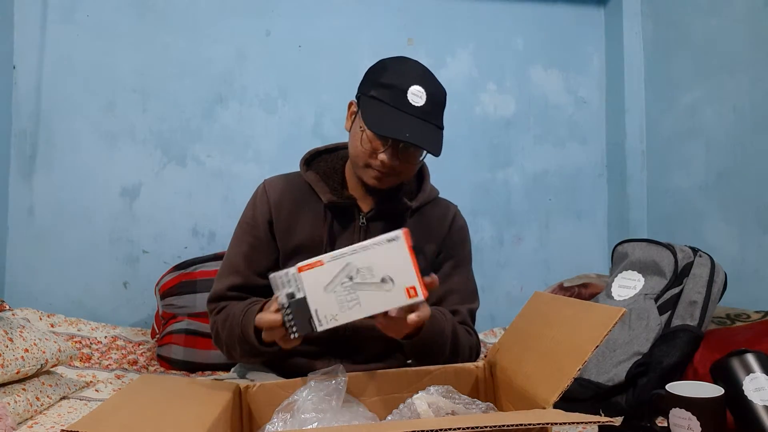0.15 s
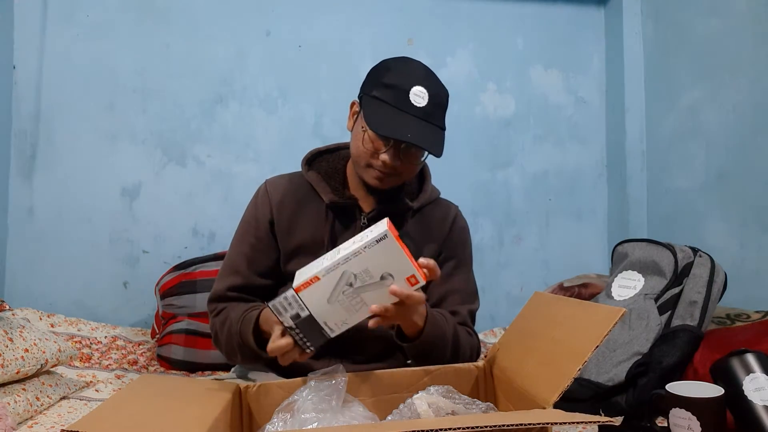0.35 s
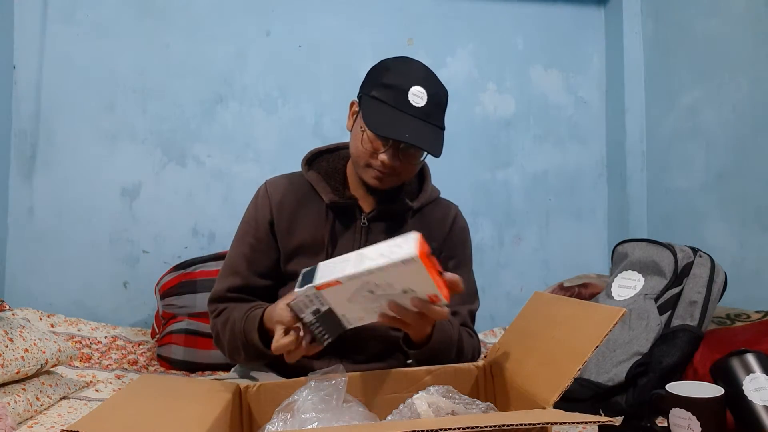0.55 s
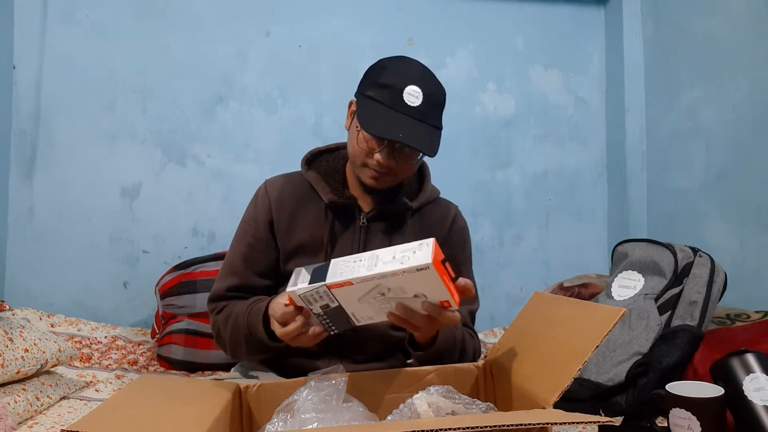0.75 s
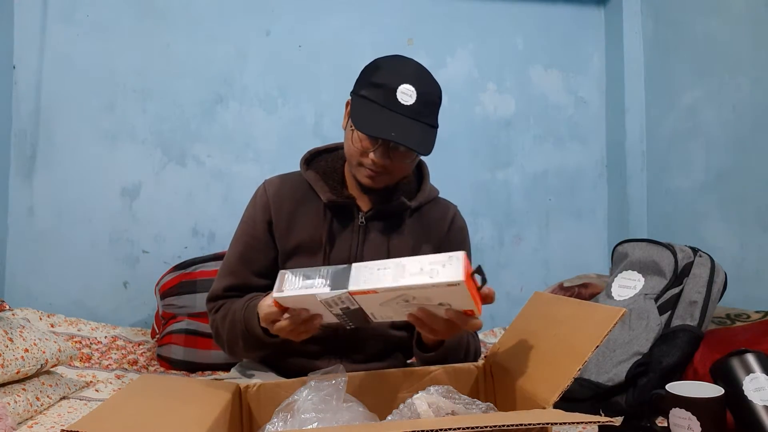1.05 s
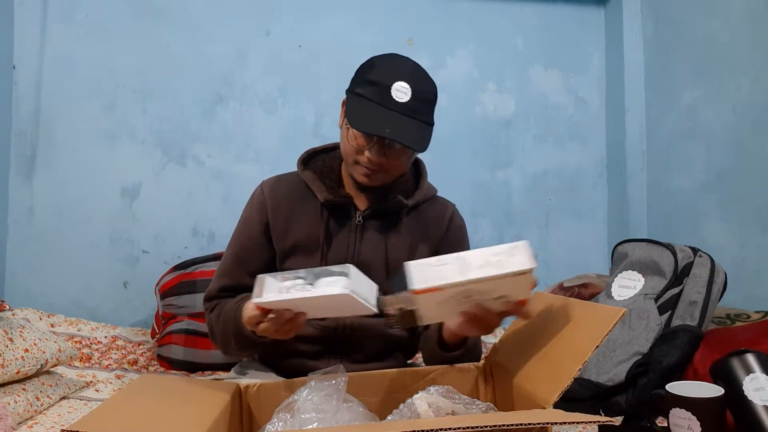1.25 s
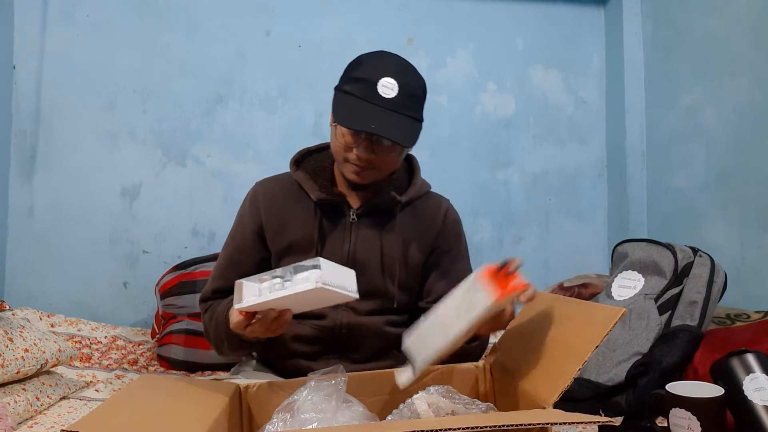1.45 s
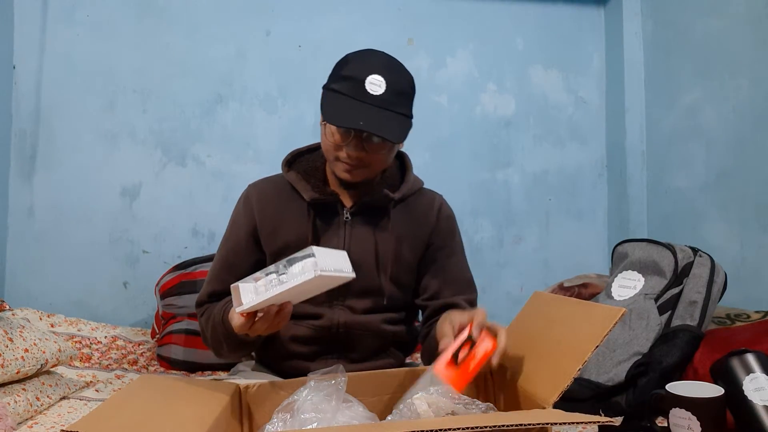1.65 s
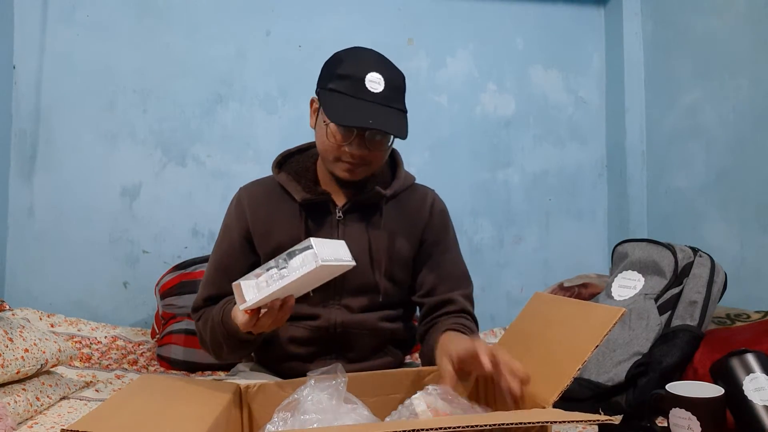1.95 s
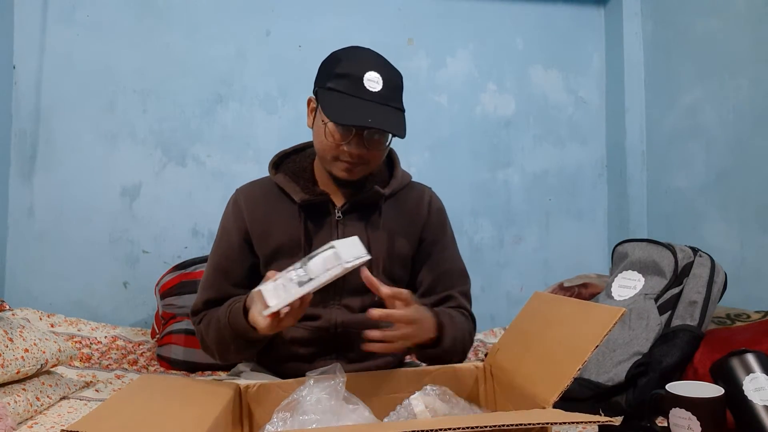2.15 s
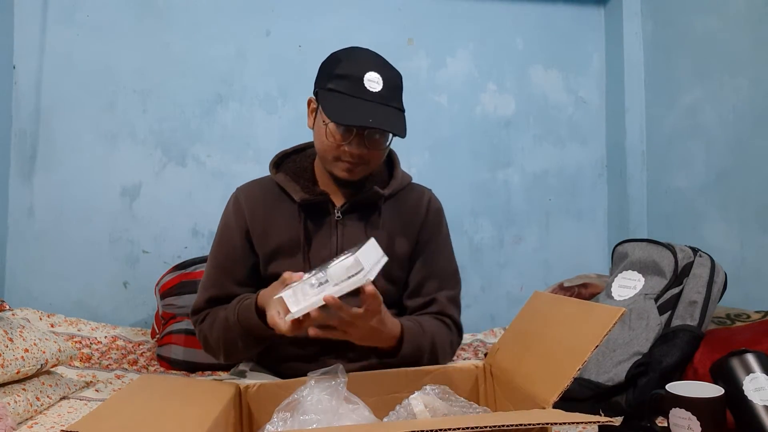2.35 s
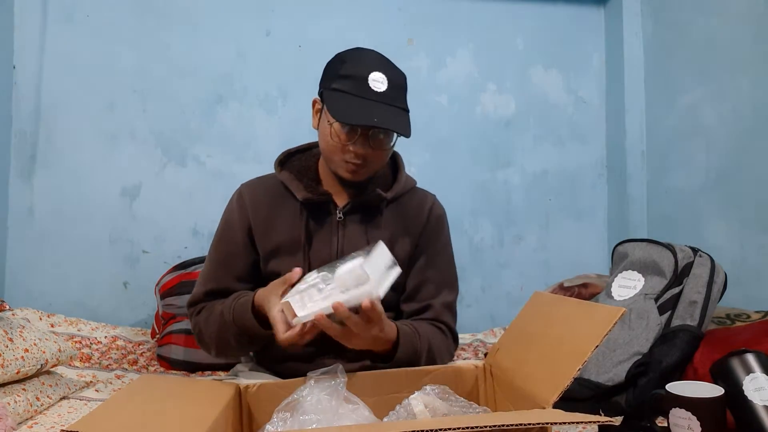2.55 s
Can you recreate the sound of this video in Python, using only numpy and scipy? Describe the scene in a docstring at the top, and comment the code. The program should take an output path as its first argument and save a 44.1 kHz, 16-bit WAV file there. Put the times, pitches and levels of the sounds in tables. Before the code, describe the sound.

Cardboard packaging handled in a small quiet room: light taps and a scrape, three short squeaky tugs as a plastic tray slides out, then the empty sleeve knocks and rustles into a large carton, heard from a metre or two.

```python
"""In a small quiet room a thin card sleeve is worked open by hand: grainy hiss, scrape, ringing taps.
A plastic tray slides out in three tugs, squeaking on the card as sine slips and grit that rings edge modes.
The empty sleeve drops into a large carton: filtered grains rustle as film, blows and rumble ring wall modes.
Last, fingers brush the tray: high hiss over a duller rub.
A two-port microphone hears it a metre or two away, over steady room tone and a diffuse noise tail."""
import sys
import numpy as np
from scipy import signal
from scipy.fft import rfft, irfft, next_fast_len
from scipy.io import wavfile
from scipy.ndimage import uniform_filter1d, map_coordinates

SR = 44100
rng = np.random.default_rng(int(sys.argv[2]) if len(sys.argv) > 2 else 0)


def unload_audio(sound):
    """Save the sound as a 16-bit wav file, at the path given as the first command line argument."""
    columns = np.transpose(np.atleast_2d(sound))
    # keep every value between -1 and 1, then stretch to whole-number steps
    steps = np.round(np.clip(columns, -1, 1) * 32767)
    wavfile.write(sys.argv[1], SR, steps.astype(np.int16))


N = 119070


def undb(db):
    """Decibels to amplitude."""
    return 10 ** (np.asarray(db) / 20)


def unit(x):
    """Scale to unit RMS."""
    return x / np.sqrt(np.mean(x ** 2))


def unit_energy(x):
    """Scale to unit energy, averaged over the channels of a two-channel array."""
    channels = len(x.shape)
    return x / np.sqrt(np.sum(x ** 2) / channels)


def fade(t_s, t60_s):
    """Exponential decay by 60 dB in t60, at least 5 ms."""
    return np.exp(-np.log(1000) * np.abs(t_s) / np.maximum(t60_s, .005))


def colour(x, points):
    """Zero-phase filter through (Hz, dB) points, interpolated over log frequency."""
    hz, db = np.array(points, float).T
    length = x.shape[-1]
    n = next_fast_len(length)
    bin_hz = np.maximum(np.arange(n // 2 + 1) * SR / n, 1)
    gain_db = np.interp(np.log(bin_hz), np.log(np.maximum(hz, 1)), db)
    return irfft(rfft(x, n) * undb(gain_db), n)[..., :length]


def curve(table, axis):
    """Gain over time from one dB column, -150 dB outside the table."""
    p = np.array(table, float)
    return undb(np.interp(np.arange(N) / SR, p[:, 0], p[:, axis], left=-150, right=-150))


def ring(x, modes):
    """Excite decaying sine modes, sign flipping every four; the summed impulse response peaks at 1."""
    t = np.arange(SR // 4) / SR
    body = 0
    for k, (hz, db, t60) in enumerate(modes):
        decay = np.exp(-np.log(1000) * t / max(t60, .004))
        body = body + (-1) ** (k // 4) * undb(db) * np.sin(2 * np.pi * hz * t) * decay
    return signal.fftconvolve(x, body / np.abs(body).max())[:N]


def band(x, hz, width_hz):
    """Resonant band at unit RMS."""
    return unit(signal.lfilter(*signal.iirpeak(hz, hz / width_hz, fs=SR), x))


def grains(rate_per_s, scatter_db):
    """Dense random clicks of uneven size, unit RMS."""
    hit = rng.random(N) < rate_per_s / SR
    boost_db = scatter_db * np.minimum(rng.exponential(size=N), 2)
    return unit(hit * rng.standard_normal(N) * undb(boost_db))


def walk(rate_per_s):
    """Smoothed random steps, unit RMS."""
    k = int(SR / rate_per_s)
    steps = np.repeat(rng.standard_normal(N // k + 1), k)
    return unit(uniform_filter1d(uniform_filter1d(steps, k), k)[:N])


THUMP_S, CRACK_ABOVE_HZ, RATTLE_RISE_S = 0.00026, 554, 0.0036


def blows(table, modes):
    """Each blow is a soft thump and a hard crack, both with a fading noise rattle, ringing the body."""
    push, t = np.zeros((2, N + SR)), np.arange(SR // 2) / SR
    chance = rng.standard_normal((len(table), 2, len(t)))
    for (s, crack_db, thump_db, rattle_db, t60), noise in zip(table, chance):
        shape = np.clip(t / RATTLE_RISE_S, 0, 1) * fade(t, t60)
        rattle = noise * undb(rattle_db) * shape / np.sqrt(np.sum(shape ** 2))
        force = (t == 0) + rattle
        start = int(s * SR)
        push[:, start:start + len(t)] += undb([[thump_db], [crack_db]]) * force
    soft = t * np.exp(-t / THUMP_S)
    thump = signal.fftconvolve(push[0], soft / soft.sum())
    crack = signal.sosfilt(signal.butter(2, CRACK_ABOVE_HZ, "high", fs=SR, output="sos"), push[1])
    return ring(thump[:N] + crack[:N], modes)


# Spread of diffuse sound. Each row: frequency in Hz, side over mid in dB.
SIDE_WIDTH = [(40, -9), (120, -11), (300, -11), (600, -2.5), (1200, -1.5), (2500, -0.9), (15000, 0.2)]


def spread(mid, side):
    """Two diffuse signals to left and right; the bass is nearly the same in both."""
    side = colour(side, SIDE_WIDTH)
    return np.array([mid + side, mid - side])


# Room tone spectrum. Each row: frequency in Hz, relative gain in dB.
AIR_COLOUR = [(12, -37.5), (20, -1.5), (98, -2.5), (316, -7.5), (406, -13.5), (583, -13), (1780, -38.5),
              (1930, -29.5), (3380, -59), (4990, -53), (15600, -33)]
AIR_DB, AIR_WAVER_DB_RMS = -65.5, 3


def air():
    """Room tone: coloured noise, its level wavering a little."""
    noise = colour(rng.standard_normal((2, N)), AIR_COLOUR)
    mid, side = noise * undb(AIR_WAVER_DB_RMS * walk(6.16))
    return unit(spread(mid, side)) * undb(AIR_DB)


# Card-on-card spectrum. Each row: frequency in Hz, relative gain in dB.
SCRAPE_SPECTRUM = [(500, -23.5), (900, 8), (1500, -2.5), (2200, 1.5), (3200, -7), (5000, -29.5)]


def scrape():
    """Coarse card-on-card grit in the middle register, its level flickering."""
    return unit(colour(grains(2500, 1.74), SCRAPE_SPECTRUM)) * undb(0.7 * walk(59.83))


# Rubbing of fingers, tray and card.
# Each row: time in seconds, then treble hiss, scrape, sleeve hum and tray ring, all in dB.
SLIDE_LEVELS = [(0.0, -70, -85, -60, -87), (0.088, -69, -69, -64, -80), (0.22, -81.5, -86, -87, -91.5),
                (0.386, -81, -82, -59.5, -83), (0.41, -69, -40.5, -41, -73), (0.426, -72, -66, -45, -76),
                (0.454, -56.5, -54, -47.5, -70), (0.504, -79, -61.5, -57, -71),
                (0.572, -56.5, -62, -66, -78), (0.602, -50.5, -52.5, -54.5, -50),
                (0.622, -52, -52, -45, -72), (0.72, -56, -57, -61, -66), (0.768, -76.5, -69, -92, -83),
                (0.812, -70, -61, -71, -67), (0.838, -56, -59.5, -63, -64), (0.872, -54.5, -62, -70, -74),
                (0.896, -54, -55, -61, -62.5), (0.91, -55, -55, -68, -71), (0.946, -55, -53, -58.5, -68),
                (0.984, -60.5, -60, -61, -63), (1.048, -80, -75, -75, -94), (1.082, -71, -72, -65.5, -71.5),
                (1.142, -60, -66, -100, -66), (1.176, -61.5, -63.5, -68, -78), (1.2, -53, -61, -57, -77),
                (1.22, -55, -49, -63, -65), (1.25, -55.5, -49.5, -49, -63), (1.342, -78, -92, -69, -95),
                (1.406, -74.5, -82, -79, -104), (1.44, -85.5, -100, -78, -100),
                (1.484, -86, -95, -79, -113), (1.68, -90, -100, -83.5, -111), (1.76, -87, -100, -73, -106)]
# Hiss spectrum. Each row: frequency in Hz, relative gain in dB.
SLIDE_SPECTRUM = [(1940, -15), (3300, -1.5), (3660, -7.5), (4370, 0), (5740, -4), (7450, -8.5), (8940, -1),
                  (10500, -7), (12600, -4.5), (15600, -15.5)]
# Sleeve modes. Each row: frequency in Hz, relative level in dB, t60 in seconds (ring() holds it above 4 ms).
SLEEVE_MODES = [(205, -13.5, 0.02), (254, 0, 0.028), (349, -3.5, 0.028), (556, -7, 0.039),
                (800, -4.5, 0.025), (981, -5.5, 0.016), (1148, 0, 0.0089), (1530, -5, 0.005),
                (1750, -9, 0.04), (1994, -6, 0.014), (2750, -11, 0.02), (3060, -6, 0.0028)]
SLIDE_GRAINS_PER_S, SLIDE_SCATTER_DB = 6500, 0.5
TRAY_HZ, TRAY_WIDTH_HZ = 3740, 400


def slide():
    """Grainy hiss and scrape of tray on card; the sleeve hums and the tray rings thinly."""
    grit = grains(SLIDE_GRAINS_PER_S, SLIDE_SCATTER_DB)
    hiss = unit(colour(grit, SLIDE_SPECTRUM)) * undb(0.82 * walk(40.24))
    hum = unit(ring(grains(1500, 2.9), SLEEVE_MODES))
    tray = band(band(grit, TRAY_HZ, TRAY_WIDTH_HZ), TRAY_HZ, TRAY_WIDTH_HZ)
    parts = [hiss, scrape(), hum, tray]
    return sum(part * curve(SLIDE_LEVELS, axis=k + 1) for k, part in enumerate(parts))


# Taps and pops of the sleeve.
# Each row: start in seconds, crack in dB, thump in dB, rattle in dB re the blow, rattle t60 in seconds.
SLEEVE_BLOWS = [(.34, -43, -43.5, -2, 0.078), (.397, -42, -40, -21, 0.042), (.408, -26.5, -31.5, -5, 0.16),
                (.445, -35.5, -28, -3, 0.11), (.469, -29, -34, -8, .08), (.615, -35.5, -23.5, -15, 0.065),
                (.804, -40.5, -58, -17, 0.052), (1.218, -35, -46, 1.5, 0.12), (1.241, -43, -38, -31, 0.1),
                (1.26, -36, -36, -12, 0.078)]


def sleeve_taps():
    """Taps and pops ring the sleeve modes."""
    return blows(SLEEVE_BLOWS, SLEEVE_MODES)


# Tray edge modes. Each row: frequency in Hz, relative level in dB, t60 in seconds.
EDGE_MODES = [(1137, -2.5, 0.095), (1216, -7, 0.056), (1320, -4.5, 0.033), (2900, -5.5, 0.025),
              (3870, -8, .03)]
# Catches of the tray edge.
# Each row: start in seconds, level in dB, attack in seconds, t60 in seconds, mean slip rate in Hz.
EDGE_CATCHES = [(0.599, -33, 0.0037, 0.088, 1230), (0.614, -31.5, 0.0036, 0.057, 1196),
                (0.625, -45.5, 0.0036, .08, 1153), (0.643, -44.5, .004, 0.19, 1230),
                (0.891, -38, 0.0028, 0.051, 1148), (.904, -41, .003, 0.062, 1191),
                (0.918, -44.5, 0.0022, 0.18, 1173), (1.237, -42.5, 0.0062, 0.13, 825),
                (1.51, -70.5, 0.032, 0.35, 1139)]
SLIP_WANDER_RMS, SLIP_GRIT_DB, SLIPS_PER_S = 0.0298, -6.5, 3000


def squeak():
    """Each catch swells and fades a sine at a wandering slip rate, plus grit ringing the edge modes."""
    t, total = np.arange(N) / SR, 0
    warped_s = np.cumsum(1 + SLIP_WANDER_RMS * walk(150)) / SR
    grit = undb(SLIP_GRIT_DB) * unit(ring(grains(SLIPS_PER_S, 1.5), EDGE_MODES))
    for s, db, attack, t60, hz in EDGE_CATCHES:
        slips = np.sqrt(2) * np.sin(2 * np.pi * hz * warped_s)
        swell = np.clip((t - s) / attack, 0, 1) * fade(np.maximum(t - s - attack, 0), t60)
        total = total + undb(db) * swell * (slips + grit)
    return total


# Tumbling in the carton.
# Each row: time in seconds, then film rustle, scrape, carton rumble and deep thud, all in dB.
TUMBLE_LEVELS = [(1.76, -107, -101, -85, -68), (1.774, -69, -62.5, -62, -80),
                 (1.812, -55, -63.5, -67.5, -57.5), (1.876, -56, -50, -53.5, -63),
                 (1.926, -59.5, -63, -59, -48.5), (1.944, -52, -49, -37.5, -41.5),
                 (1.978, -49.5, -56, -40.5, -51), (1.994, -51, -40.5, -35, -44),
                 (2.024, -51, -52, -42, -49.5), (2.068, -55, -50, -53.5, -44), (2.086, -55, -50, -47, -58),
                 (2.126, -54, -53, -43, -41), (2.18, -57.5, -53, -62, -45.5),
                 (2.188, -52, -42.5, -33.5, -34.5), (2.272, -64, -49.5, -38.5, -46.5),
                 (2.314, -70, -62.5, -60, -50), (2.366, -79, -79, -60, -78), (2.418, -102, -70, -58, -52.5),
                 (2.542, -109, -110, -73, -62), (2.584, -102, -82, -67, -56.5),
                 (2.664, -102, -101, -102, -65), (2.7, -92, -94, -72, -70)]
# Film spectrum. Each row: frequency in Hz, relative gain in dB.
FILM_SPECTRUM = [(1940, -28), (3300, -2.5), (7500, -7.5), (9360, -4), (10200, -8), (14000, -9.5),
                 (15600, -15)]
# Carton modes. Each row: frequency in Hz, relative level in dB, t60 in seconds.
CARTON_MODES = [(129.5, -14, 0.13), (174.6, -8.5, 0.1), (232, -3.5, 0.064), (277.7, -1, 0.047),
                (345.4, -1.5, 0.1), (413, 3, 0.075), (531, 4, 0.038), (734, -2.5, 0.037), (977, -7, 0.03),
                (1232, 2.5, 0.02), (1520, -5.5, 0.013), (1728, -5, 0.013), (1993, -15, 0.024),
                (2776, -22, 0.03)]
FILM_GRAINS_PER_S, FILM_SCATTER_DB = 5600, 2
THUD_HZ, THUD_WIDTH_HZ = 92, 42


def tumble():
    """Film crackles and card scrapes as grains while carton modes rumble and low band noise thuds."""
    grit = grains(FILM_GRAINS_PER_S, FILM_SCATTER_DB)
    film = unit(colour(grit, FILM_SPECTRUM)) * undb(1.3 * walk(50.24))
    rumble = unit(ring(grains(400, 1.7), CARTON_MODES))
    thud = band(rng.standard_normal(N), THUD_HZ, THUD_WIDTH_HZ)
    parts = [film, scrape(), rumble, thud]
    return sum(part * curve(TUMBLE_LEVELS, axis=k + 1) for k, part in enumerate(parts))


# Knocks in the carton.
# Each row: start in seconds, crack in dB, thump in dB, rattle in dB re the blow, rattle t60 in seconds.
CARTON_BLOWS = [(1.776, -49.5, -48, -11, 0.051), (1.8, -40, -42.5, -26, 0.06),
                (1.865, -27.5, -22, -12, .07), (1.89, -60, -27.5, -9, 0.072), (1.94, -21.5, -14, -7, 0.14),
                (1.956, -28, -16, -7, 0.047), (1.988, -13, -18, -7.5, 0.1), (2.001, -20, -19.5, -13, 0.082),
                (2.044, -43, -25, -23, 0.04), (2.06, -32, -32, -1, 0.089), (2.084, -46, -25.5, -19, 0.12),
                (2.119, -34.5, -30.5, -5, 0.077), (2.166, -29, -27, -6, 0.058),
                (2.19, -9.5, -15.5, -12, 0.2), (2.211, -20, -14, 1, 0.17), (2.234, -28, -23.5, -18, 0.082),
                (2.259, -45, -23, -28, 0.06), (2.383, -43, -44, -13, .08), (2.419, -40, -49, -10, 0.16),
                (2.552, -46, -43.5, -18, 0.11)]


def carton_knocks():
    """Knocks of the dropped sleeve ring the carton modes."""
    return blows(CARTON_BLOWS, CARTON_MODES)


# Fingers brushing the tray. Each row: time in seconds, hiss in dB, rub in dB.
BRUSH_LEVELS = [(2.36, -82, -76), (2.414, -85, -82), (2.424, -74, -65), (2.462, -83, -80),
                (2.542, -76.5, -96), (2.552, -73, -83), (2.582, -74, -73), (2.7, -81, -84)]
# Skin hiss spectrum. Each row: frequency in Hz, relative gain in dB.
BRUSH_SPECTRUM = [(5000, -17), (7500, 1.5), (9000, 5), (12000, 1), (15600, -7)]
RUB_HZ, RUB_WIDTH_HZ = 1990, 540


def brush():
    """Soft, high hiss of skin on plastic over a duller rub, both from the same grains."""
    grit = grains(4600, 1.3)
    hiss = unit(colour(grit, BRUSH_SPECTRUM))
    rub = band(band(grit, RUB_HZ, RUB_WIDTH_HZ), RUB_HZ, RUB_WIDTH_HZ)
    return hiss * curve(BRUSH_LEVELS, axis=1) + rub * curve(BRUSH_LEVELS, axis=2)


# Reverberation. Each row: frequency in Hz, t60 in seconds.
REVERB_T60 = [(100, 0.73), (1000, 0.28), (15000, 0.19)]
ROOM_DB, ROOM_GAP_S = -10, 0.0047
NEAR_DB, NEAR_T60_S = -7, 0.031  # reflections off bed, body and carton, opposite in the two ports


def room(x, point):
    """Close reflections widen the point-like hits; a diffuse tail, shorter in the treble, follows."""
    t, tail = np.arange(SR // 2) / SR, 0
    table_hz, table_t60_s = np.array(REVERB_T60).T
    for hz in 60 * 2. ** np.arange(9):
        t60 = np.interp(np.log(hz), np.log(table_hz), table_t60_s)
        octave = [(hz / 2, -60), (hz / 1.4, -3), (hz, 0), (hz * 1.4, -3), (hz * 2, -60)]
        part = colour(rng.standard_normal((2, len(t))), octave)
        tail = tail + part * fade(t, t60) / np.sqrt(t60)
    tail = tail * np.clip(t / ROOM_GAP_S - 1, 0, 1)  # silent for one gap, full after two
    near = rng.standard_normal(len(t)) * fade(t, NEAR_T60_S)
    mid, side = signal.fftconvolve(x[None], undb(ROOM_DB) * unit_energy(tail), axes=1)[:, :N]
    close = signal.fftconvolve(point, undb(NEAR_DB) * unit_energy(near))[:N]
    return spread(mid, side + close)


PORT_LAG_S = .00009


def scene():
    """Point-like hits reach the right port late; rubbing is spread wide; room and air are added."""
    point = squeak() + sleeve_taps() + carton_knocks()
    late = map_coordinates(point, [np.arange(N) - PORT_LAG_S * SR], mode="nearest")
    # rubbing comes from wide surfaces, so each port hears partly its own grains
    mid, side = (slide() + tumble() + brush() for _ in range(2))
    return np.array([point, late]) + spread(mid, side) + room(point + mid, point) + air()


# Port colour difference. Each row: frequency in Hz, left minus right in dB.
PORT_DIFFERENCE = [(60, 0), (250, 0.7), (600, 1.1), (2000, 0.1), (4000, 1.4), (6000, -3), (8000, 3),
                   (15000, 8)]
MIC_LOW_HZ, TOP_HZ = 55, 15800


def record(dry):
    """The two ports differ in colour; deep bass rolls off and the top is cut steeply."""
    # half the difference to each port
    left_points, right_points = ([(hz, share * db) for hz, db in PORT_DIFFERENCE] for share in (.5, -.5))
    ports = np.array([colour(dry[0], left_points), colour(dry[1], right_points)])
    ports = signal.sosfilt(signal.butter(4, MIC_LOW_HZ, "high", fs=SR, output="sos"), ports)
    return signal.sosfilt(signal.ellip(12, .2, 80, TOP_HZ, fs=SR, output="sos"), ports)


dry = scene()
out = record(dry)
unload_audio(out)
```